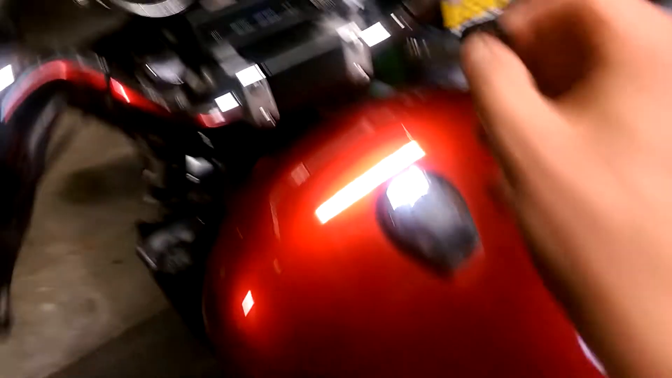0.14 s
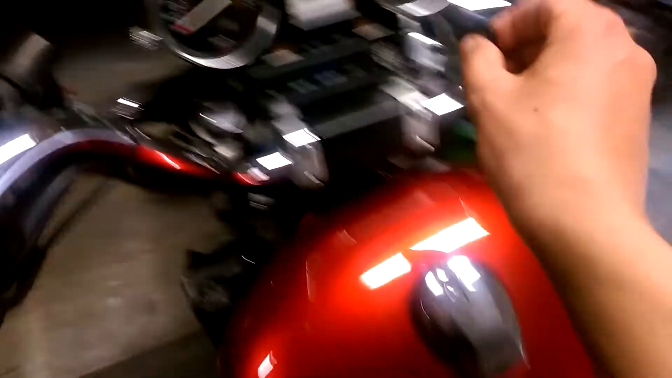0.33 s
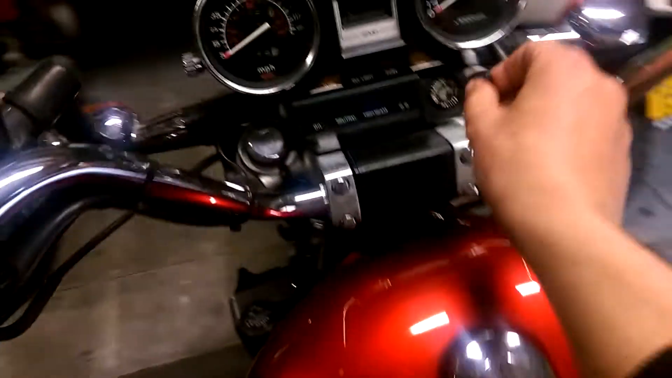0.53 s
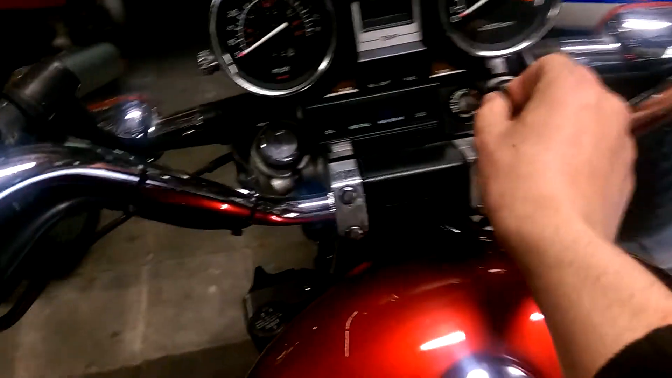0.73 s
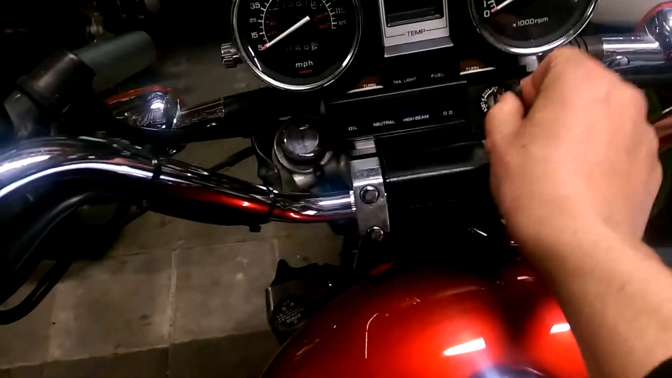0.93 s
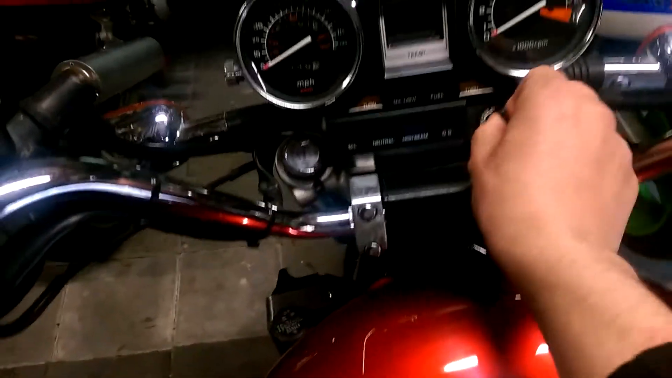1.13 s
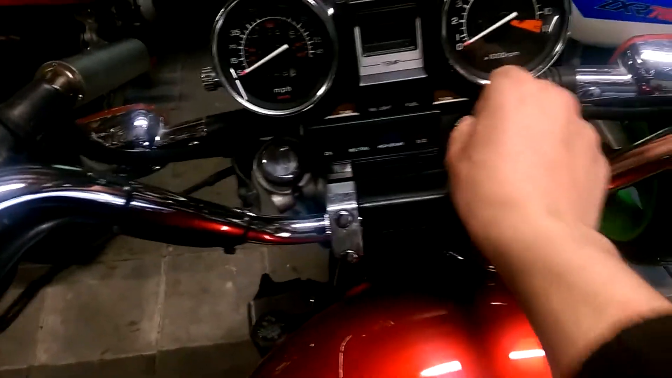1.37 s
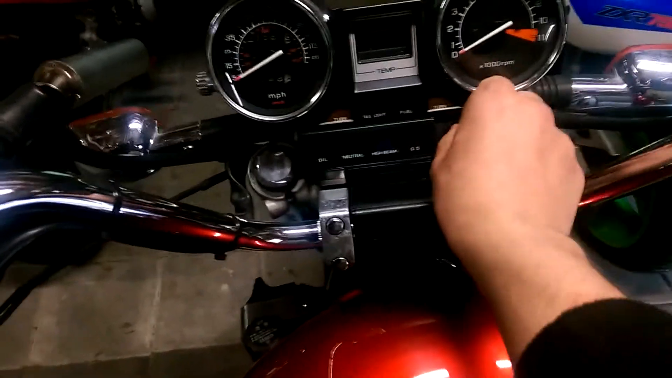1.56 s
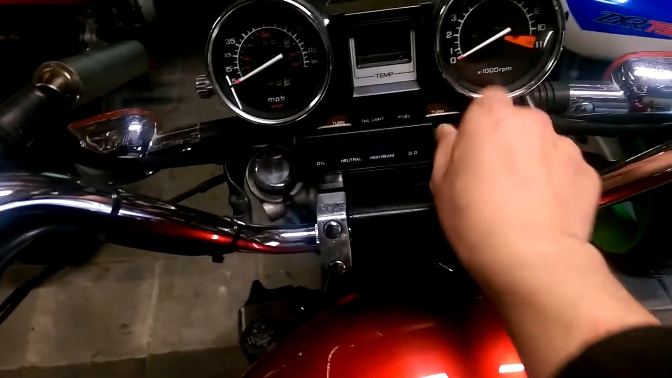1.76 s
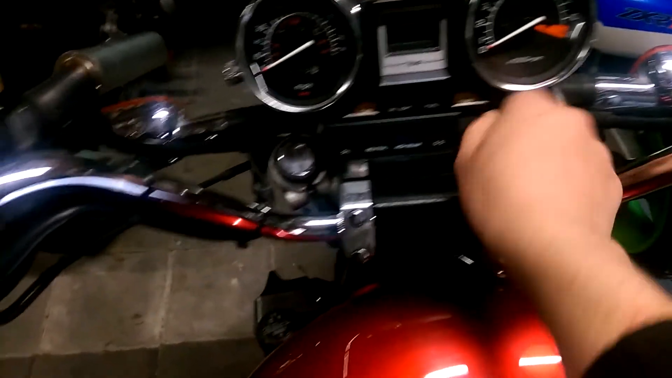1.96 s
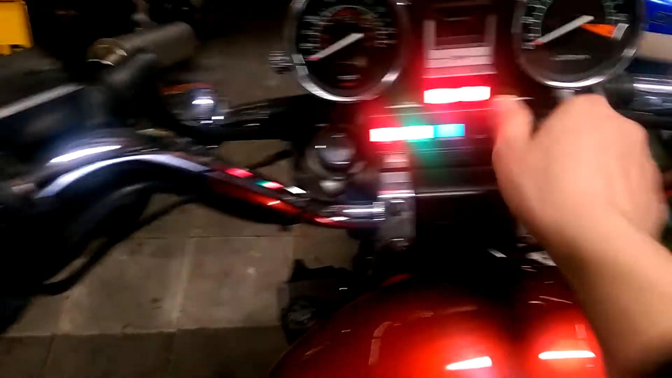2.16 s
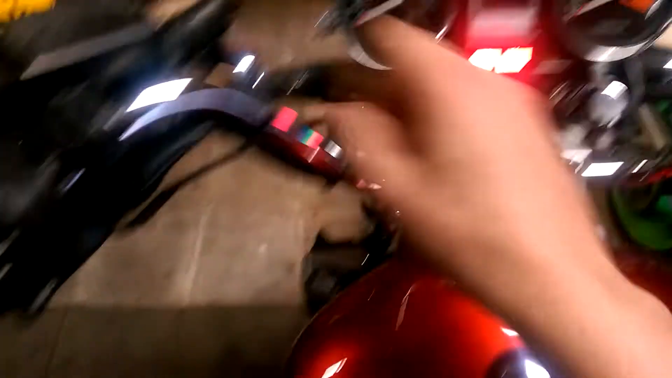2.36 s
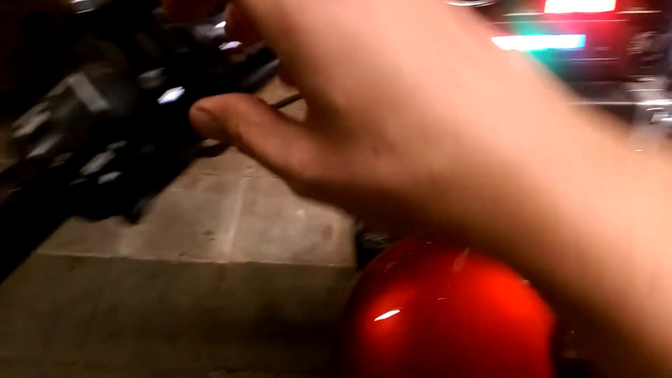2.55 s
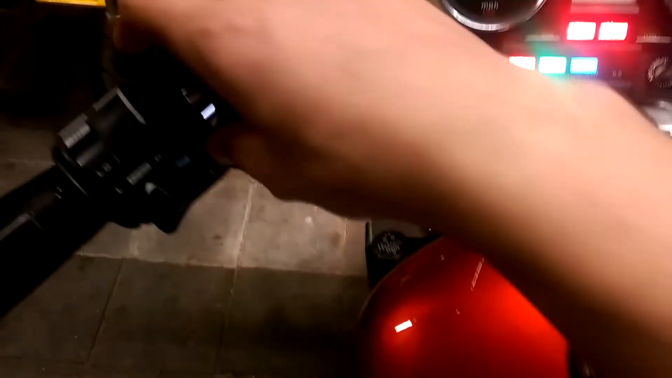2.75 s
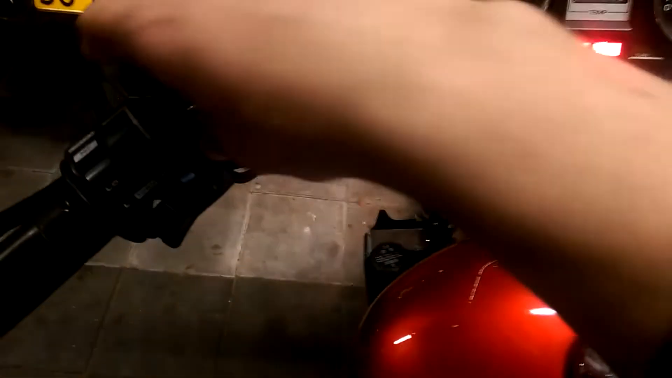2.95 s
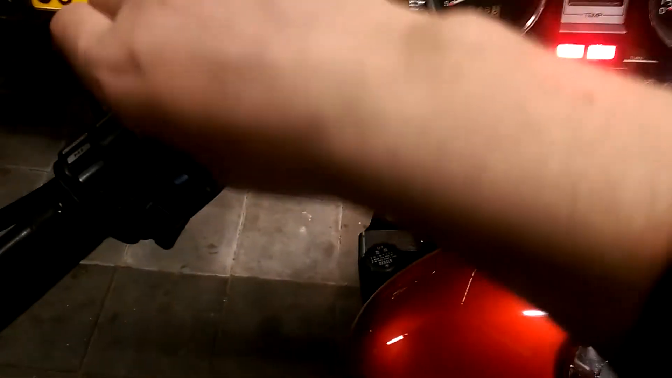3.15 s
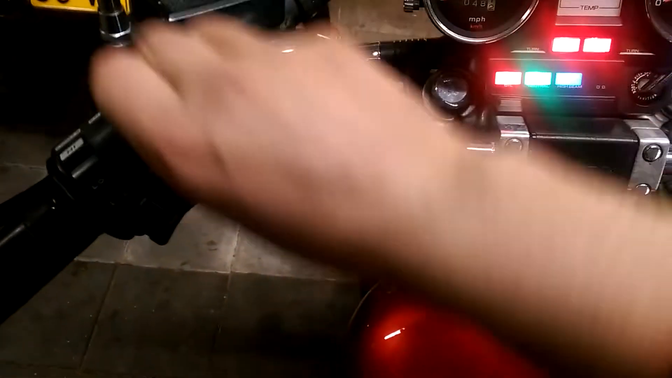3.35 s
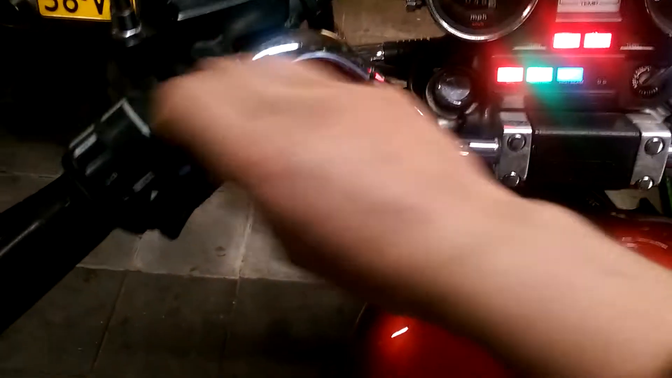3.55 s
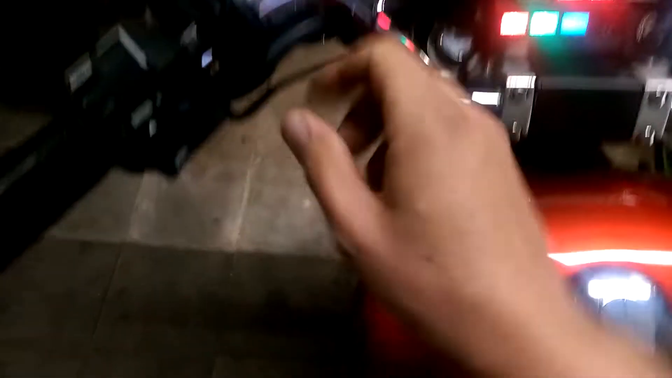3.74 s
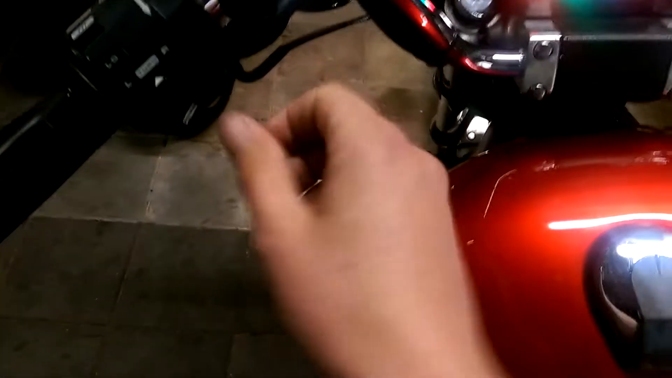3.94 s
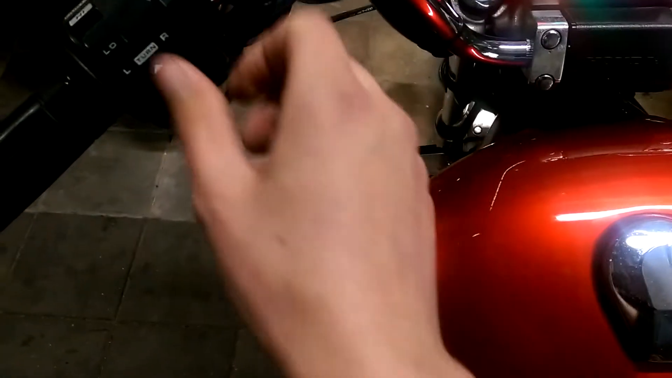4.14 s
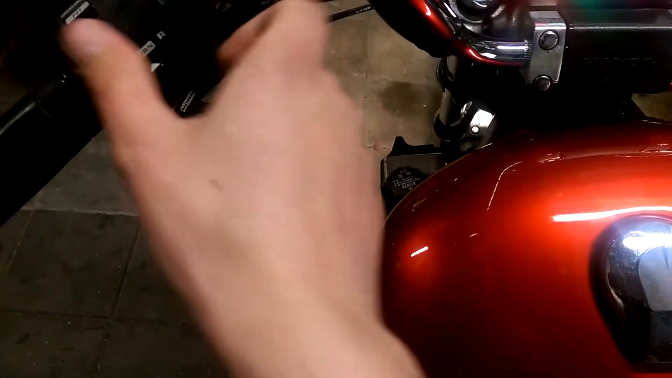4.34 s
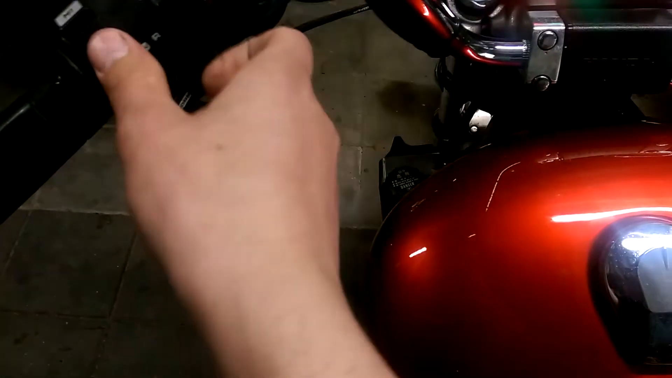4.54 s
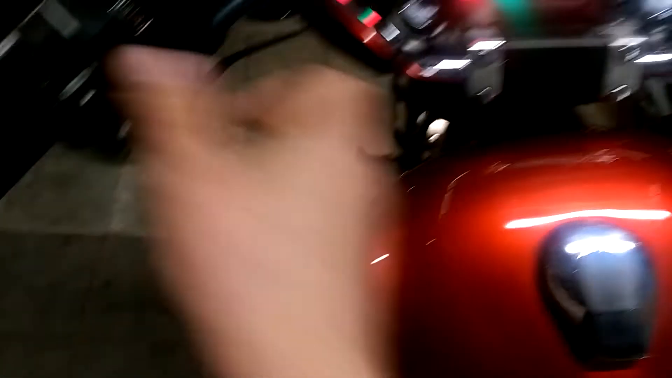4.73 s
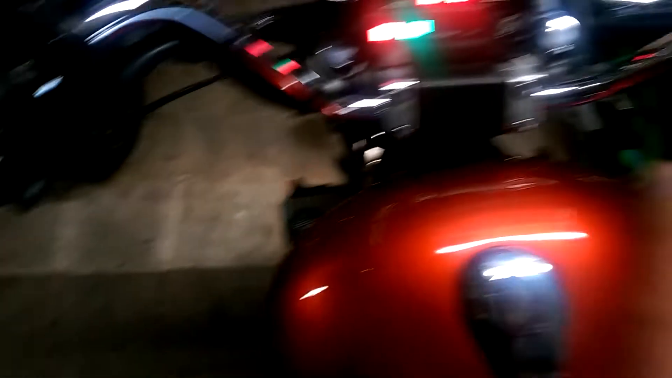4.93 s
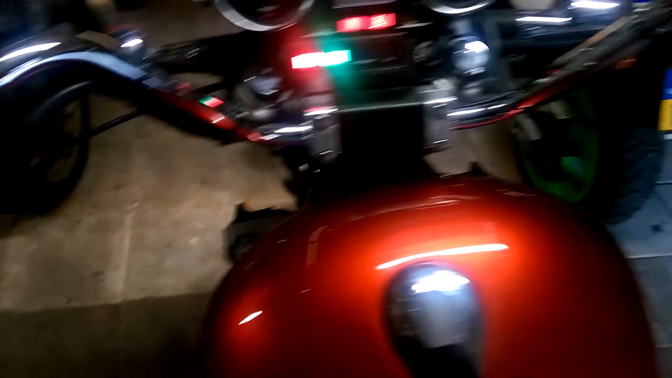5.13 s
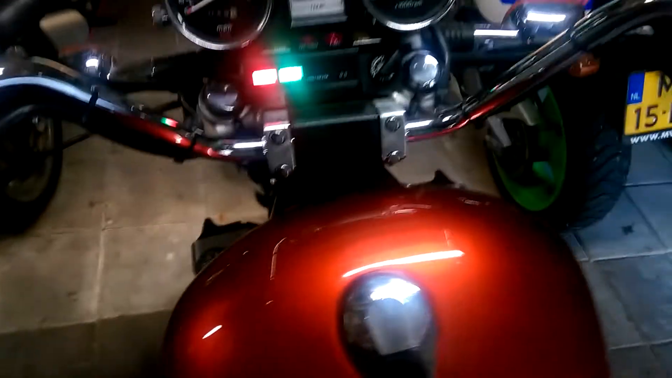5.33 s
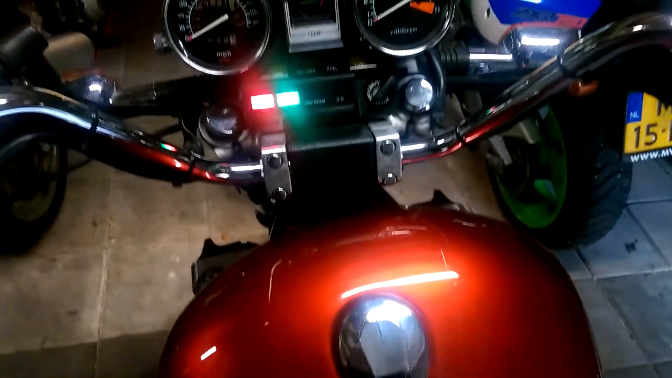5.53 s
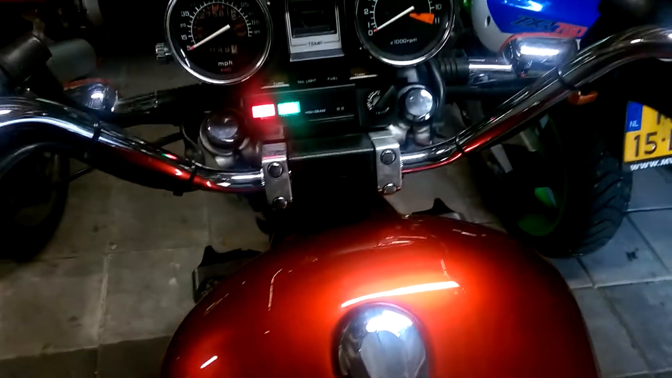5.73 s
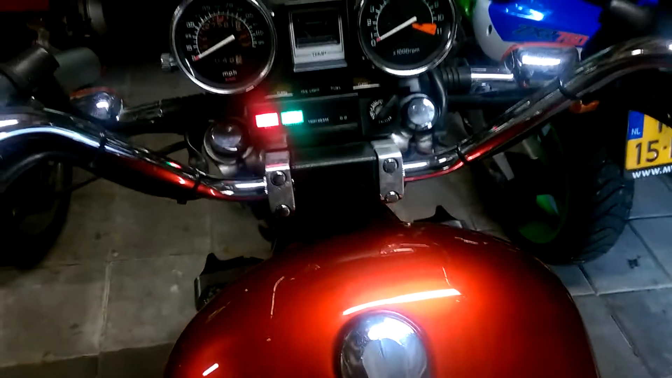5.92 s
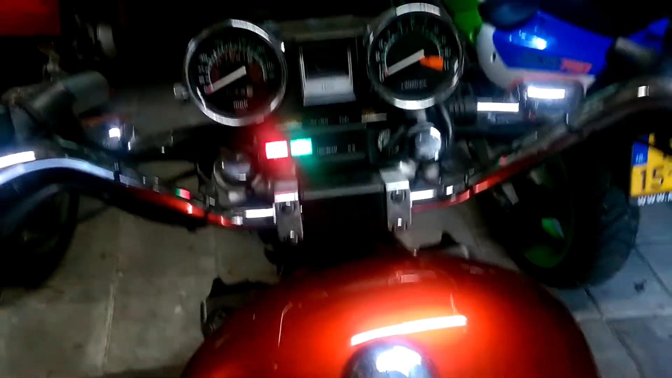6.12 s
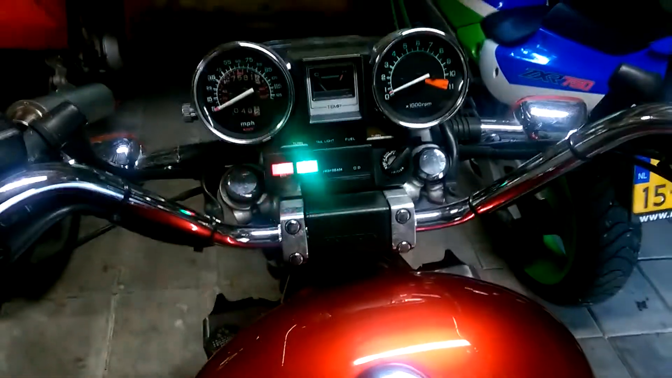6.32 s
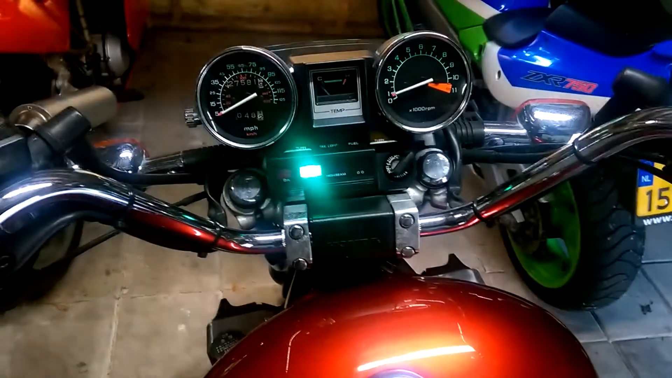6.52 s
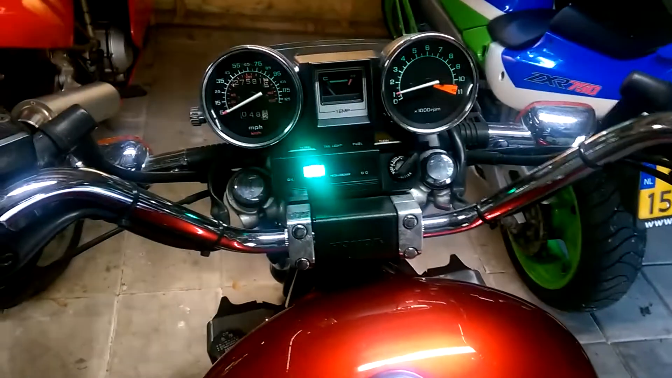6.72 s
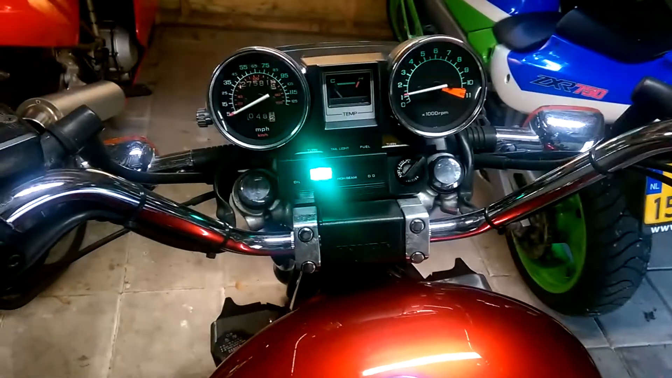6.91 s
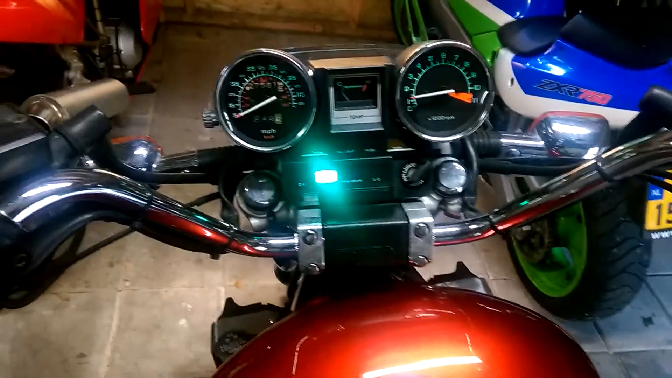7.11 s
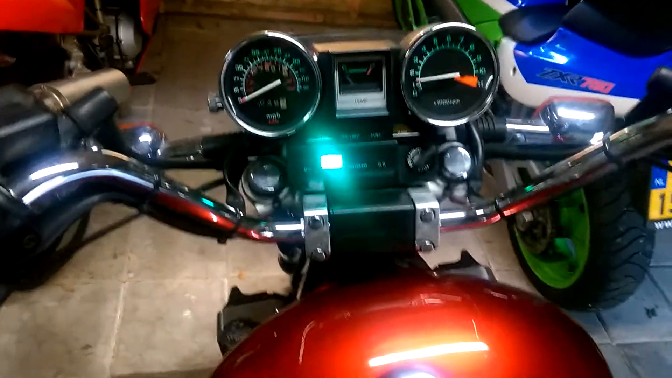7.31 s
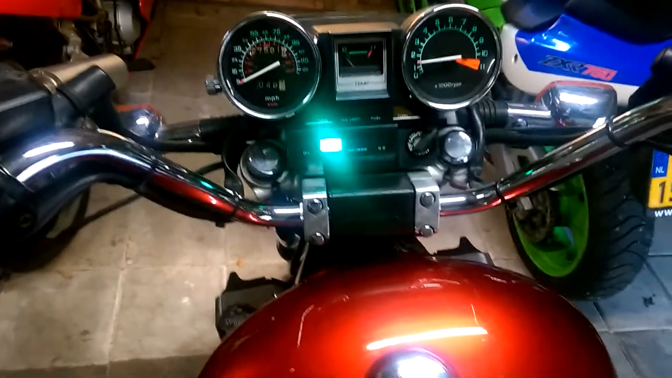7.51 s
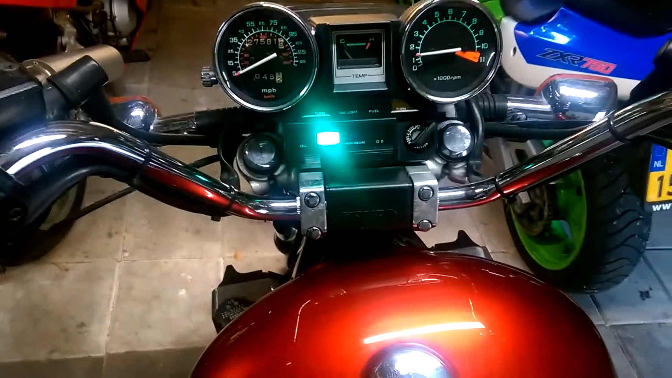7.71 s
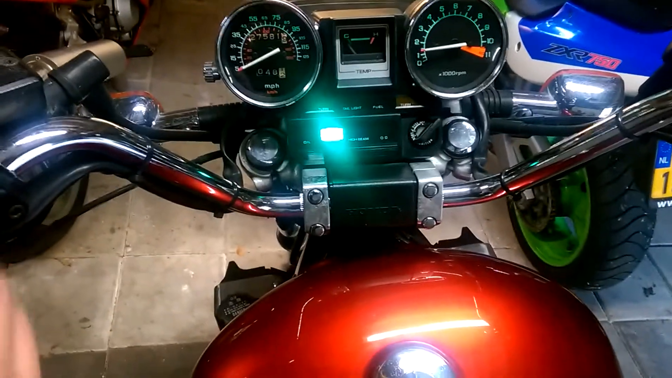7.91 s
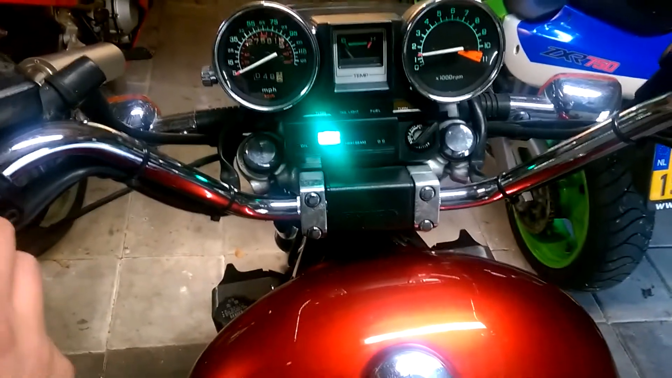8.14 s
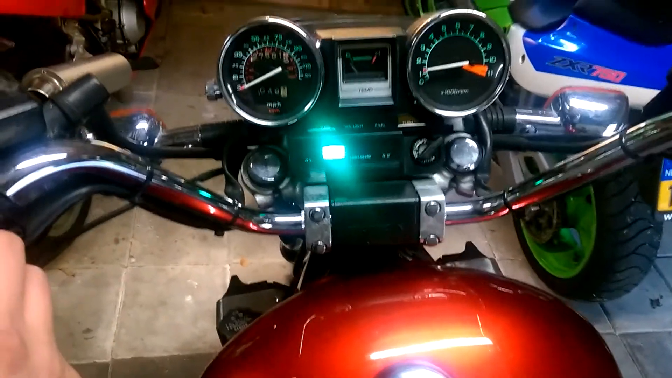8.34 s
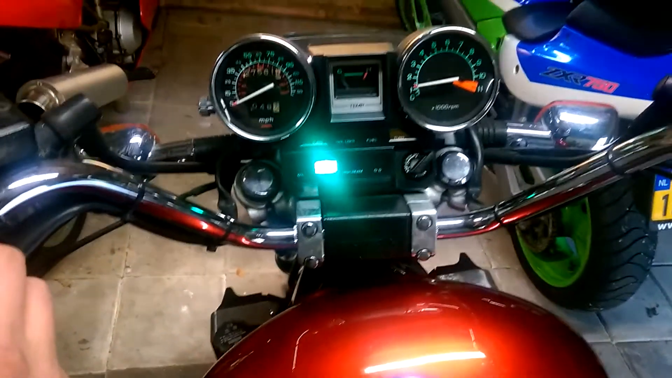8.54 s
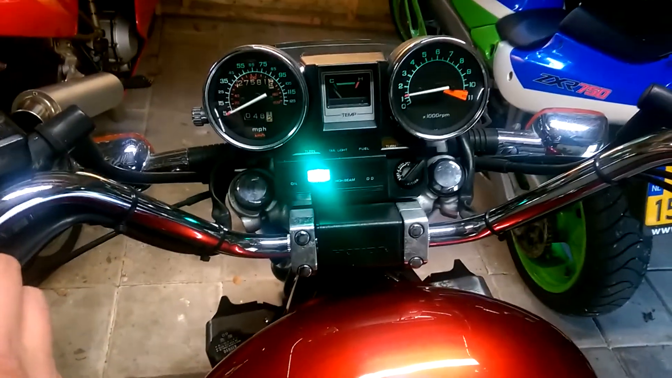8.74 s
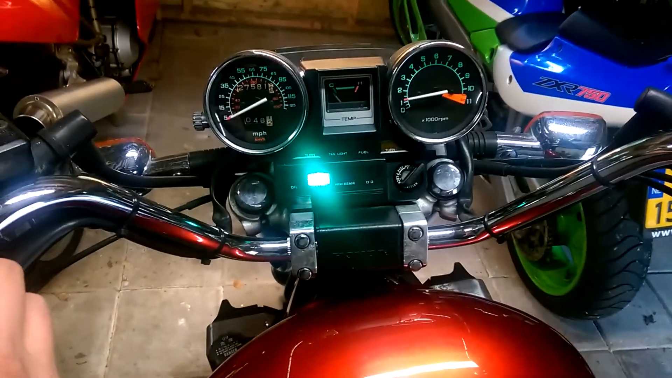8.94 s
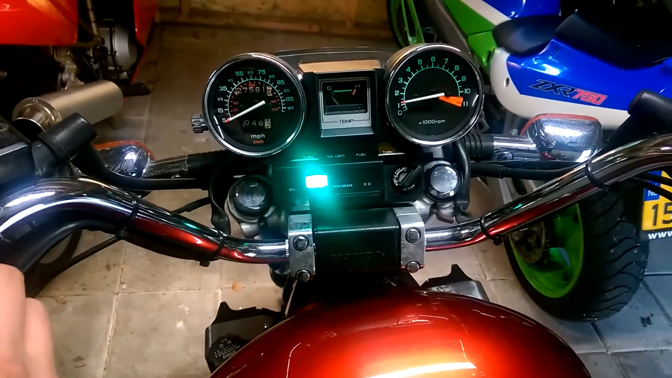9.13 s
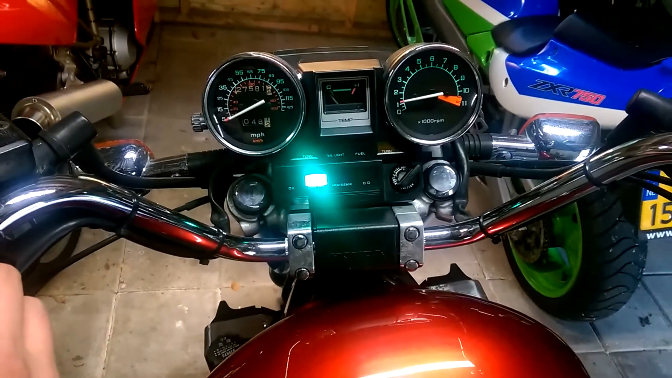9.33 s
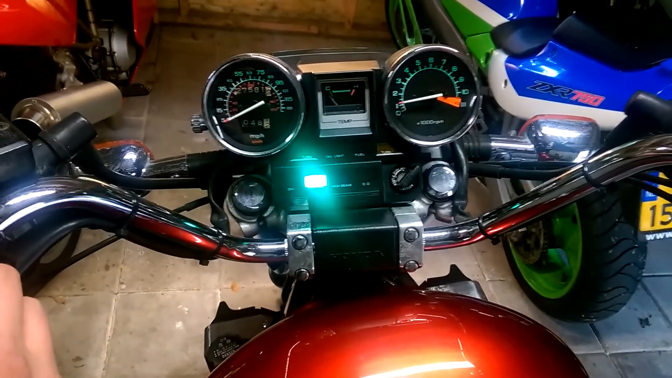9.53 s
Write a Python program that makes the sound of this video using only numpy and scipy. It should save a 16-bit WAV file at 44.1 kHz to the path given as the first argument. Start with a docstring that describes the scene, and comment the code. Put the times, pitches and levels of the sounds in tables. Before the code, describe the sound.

Key scrapes and clicks, a few sharp switch snaps, then a starter grinds and whines until a motorcycle engine catches and idles in a garage.

```python
"""A small garage, heard from above the tank, where a four-cylinder motorcycle is started cold.
The key scrapes, ticks and turns and switches click: short noise bursts excite damped resonances.
Starter gears grind and whine (tooth impacts, rough noise and gliding sines) until the engine catches.
Uneven firing impulses boom through exhaust and garage modes over noisy valve clatter and chain rush;
the fast idle then settles lower, with spells of a narrow-band rattle."""
import sys
import numpy as np
from scipy import signal
from scipy.fft import rfft, irfft, next_fast_len
from scipy.io import wavfile
from scipy.ndimage import uniform_filter1d

SR = 44100
rng = np.random.default_rng(int(sys.argv[2]) if len(sys.argv) > 2 else 0)


def waveform_to_disk(signal):
    """Save audio, clipped to [-1, 1], as 16-bit WAV at the path in sys.argv[1]."""
    frames = np.transpose(np.atleast_2d(signal))
    scaled = np.clip(frames, -1, 1) * 32767
    samples = np.round(scaled).astype(np.int16)
    wavfile.write(sys.argv[1], SR, samples)


N = 426447
T = np.arange(N) / SR
SIZE = next_fast_len(N + SR)
HZ = np.maximum(np.arange(SIZE // 2 + 1) * SR / SIZE, 1e-3)

# the starter engages, the engine catches, then fires evenly
STARTER_S, CATCH_S, EVEN_FROM_S = 5.626, 6.1, 6.485


def amp(db):
    """Level to amplitude: 20 dB is a factor of ten."""
    return 10 ** (np.asarray(db) / 20)


def curves(table):
    """Linear interpolation in time of each column of a table."""
    s, *columns = np.transpose(table)
    return [np.interp(T, s, c) for c in columns]


def unit(x):
    """Normalisation of the mean power: rms 1."""
    return x / np.sqrt(np.mean(x ** 2))


def through(x, response):
    """Linear filtering: the spectrum times a frequency response."""
    return irfft(rfft(x, SIZE) * response, SIZE)[..., :N]


def colour(points):
    """Minimum-phase response through (f/Hz, level/dB) points: a folded cepstrum makes it causal."""
    hz, db = np.transpose(points)
    level_db = np.interp(np.log(HZ), np.log(hz), db)
    cepstrum = irfft(np.log(amp(level_db)), SIZE)
    cepstrum[1:SIZE // 2] *= 2
    return np.exp(rfft(cepstrum[:SIZE // 2], SIZE))


def resonances(modes):
    """Modal superposition: summed damped oscillators (f/Hz, width/Hz, level/dB)."""
    return sum(amp(db) / (1 + 1j * (HZ / hz - hz / HZ) * hz / width) for hz, width, db in modes)


def noise():
    """White noise: equal power at every frequency."""
    return rng.standard_normal(N)


def ears(apart_hz):
    """Diffuse-field coherence: noise alike at both ears in the bass, unrelated well above apart_hz."""
    difference = through(noise(), 1j * HZ / (apart_hz + 1j * HZ))
    return noise() + np.array([[1], [-1]]) * difference


def walk(rate):
    """Low-pass random modulation: smoothed steps, rate per second, with rms 1."""
    k = max(int(SR / rate), 1)
    steps = np.repeat(rng.standard_normal(N // k + 1), k)[:N]
    return unit(uniform_filter1d(steps, k))


def since(start_s):
    """Elapsed time in seconds, 0 before the start."""
    return np.maximum(T - start_s, 0)


def ramp(start_s, length_s):
    """Linear onset from 0 to 1."""
    return np.clip((T - start_s) / length_s, 0, 1)


def swell(middle_s, length_s):
    """Raised-cosine envelope: a smooth rise and fall."""
    return np.cos(np.pi * np.clip((T - middle_s) / length_s, -.5, .5)) ** 2


def garage(x, wet_db, t60_low=1.0, t60_high=0.21):
    """Reverberation: dense reflections, different at each ear, decay exponentially by band."""
    t = T[:SR * 2 // 3]
    echoes = rng.standard_normal((2, len(t))) * np.clip((t - .003) / 0.0044, 0, 1)
    low = signal.sosfilt(signal.butter(1, 3000, fs=SR, output="sos"), echoes)
    high = echoes - low
    tail = low * amp(-60 * t / t60_low) + high * amp(-60 * t / t60_high)
    tail /= np.sqrt(np.sum(tail ** 2) / 2)
    reflected = through(x, rfft(tail, SIZE))
    return (x + amp(wet_db) * reflected) / np.sqrt(1 + amp(2 * wet_db))


def background(hum_hz=64, hum_width=11, hum_db=-54, air_db=-55):
    """Ambient noise: a frequency-modulated hum in resonant noise, under partly coherent broadband air."""
    # air spectrum: f/Hz, relative level/dB
    air_colour = [(60, -4.5), (120, -4), (250, -12.5), (500, -14.5), (1100, -14), (2200, -16),
                  (4000, -21.5), (7000, -28), (16000, -28.5)]
    # squaring the resonance narrows it
    hum = unit(through(noise(), resonances([(hum_hz, hum_width, 0)]) ** 2))
    steady = np.sin(2 * np.pi * np.cumsum(hum_hz + 2.0 * walk(5.8)) / SR)
    two_sides = np.array([noise(), noise()])
    air = unit(through(two_sides + noise(), colour(air_colour)))
    return amp(hum_db) * unit(hum + 0.55 * steady) + amp(air_db) * air


def key_scrapes():
    """Sliding friction: randomly modulated noise as the key blade scrapes over the lock and into it."""
    # scraping strokes: middle t/s, level/dB, length/s
    scrapes = [(0.298, -38, 0.12), (0.575, -46, 0.22), (0.856, -42, 0.092)]
    # friction spectrum: f/Hz, relative level/dB
    scrape_colour = [(410, -37), (700, -30), (922, -36), (1020, -21), (2330, -5), (7790, -12.5),
                     (12600, -8), (16000, -24)]
    push = sum(amp(db) * swell(s, length) for s, db, length in scrapes)
    friction = unit(through(noise() * amp(2 * walk(440)), colour(scrape_colour)))
    return garage(push * friction, wet_db=5.5)


def clicks(table, body, pan_db, tail_s):
    """Impact excitation: a short noise crack rings the body, with a low thud and a diffuse wash."""
    thud_hz, thud_width, bright_hz = 380, 330, 4500
    attack_share, treble_s = 0.18, 0.26  # attack time re ring time; extra treble decay time
    crack, thud = np.zeros((2, 2, N))
    t = T[:SR // 2]
    for s, db, ring_ms, thud_db, bright_db, wet_db in table:
        ring_s = ring_ms / 1000
        attack = 1 - np.exp(-t / (attack_share * ring_s))
        direct = rng.standard_normal(len(t)) * np.exp(-t / ring_s) * attack
        wash = rng.standard_normal((2, len(t))) * np.exp(-t / tail_s) * (1 - np.exp(-t / ring_s))
        burst = amp(db) * (direct + amp(wet_db) * np.sqrt(ring_s / tail_s) * wash)
        dull = signal.sosfilt(signal.butter(1, bright_hz, fs=SR, output="sos"), burst)
        i = int(s * SR)
        crack[:, i:i + len(t)] += dull + amp(bright_db) * (burst - dull) * np.exp(-t / treble_s)
        thud[:, i:i + len(t)] += burst * amp(thud_db)
    pan = amp(np.array([[pan_db], [-pan_db]]) / 2)  # left minus right
    ringing = through(crack, body)
    # squared, the resonance peaks at +8 dB
    knock = through(thud, resonances([(thud_hz, thud_width, 4)]) ** 2)
    return pan * (ringing + garage(knock, wet_db=3.5, t60_low=0.41, t60_high=0.35))


def pin_ticks():
    """Impact excitation of plate modes: lock pins ride over the key's teeth and set it ringing."""
    # ticks: t/s, level/dB before filtering, ring time/ms, thud/dB, brightness/dB, wash/dB
    ticks = [(.786, -31.5, 9.8, -14, -5, 0), (.974, -23, 2.2, -24, -15, -6), (1.04, -32, 6.8, -24, -12, -3),
             (1.108, -23, 3.1, -32, -1, -6), (1.239, -24.5, 5.7, -20, -20, -3.5)]
    # modes of the key: f/Hz, width/Hz, level/dB
    key_ring = [(700, 30, 2), (1384, 25, 8), (1940, 200, 9.5), (2095, 34, 14), (2640, 700, -6)]
    return clicks(ticks, resonances(key_ring), pan_db=-2.5, tail_s=0.052)


def lock_clicks():
    """Impact and modal response: the key knocks into the lock and turns, ringing barrel and housing."""
    # knocks: t/s, level/dB before filtering, ring time/ms, thud/dB, brightness/dB, wash/dB
    lock_knocks = [(.331, -24.5, 1.1, -8, -11, -9), (1.302, -8, 1.4, -3, -21, -7),
                   (1.411, -34, 1.5, -23, 3, 0), (1.456, -36, 9.7, -18, -5, 0),
                   (1.543, -28, 17, -2.5, -4, -3.5), (1.752, -29, 7.9, -14, -20, -5),
                   (1.774, -25.5, 4.2, 6, -20, -7), (2.083, -37, 5, -16, -14, -4),
                   (2.093, -15, 4.8, -18, 2, -2.5), (2.264, -28, 1.05, -12, 3, -1.5),
                   (2.276, -39, 1.3, -12, 0, -1)]
    # click spectrum: f/Hz, level/dB
    click_colour = [(200, -32.5), (550, -0.5), (950, -3), (2300, 8.5), (3600, 4), (5000, -3), (10000, -5.5),
                    (16000, 0.5)]
    # modes of lock barrel and housing: f/Hz, width/Hz, level/dB
    housing = [(1030, 290, 0.5), (1430, 26, 3), (1980, 100, -4), (2090, 20, 6), (2710, 140, 2),
               (4430, 240, -6)]
    body = colour(click_colour) + resonances(housing)
    return clicks(lock_knocks, body, pan_db=-0.5, tail_s=0.068)


def switch_clicks():
    """Snap impacts coloured by a resonant housing: left grip controls, then starter relay and clutch."""
    # snaps: t/s, level/dB before filtering, ring time/ms, thud/dB, brightness/dB, wash/dB
    snaps = [(3.165, -17, 1.46, -22, 1, -6.5), (3.19, -36, 1.8, -20, 1, -9),
             (3.327, -28.5, 8.6, -9, -21, -4), (4.542, -3, 1.53, -37, 9.5, -10.5),
             (5.626, -21.5, 17, -12, 8.5, -5), (5.659, -7, 2.8, -13, -18, -11)]
    # snap spectrum: f/Hz, level/dB
    switch_colour = [(260, -63), (450, -35), (1010, 2.5), (1340, -4.5), (1440, -5.5), (2360, 1),
                     (3590, -2.5), (6430, -8), (13600, -12), (16000, -14)]
    # modes of the switch housing: f/Hz, width/Hz, level/dB
    switch_housing = [(1020, 450, -7), (1590, 400, -8)]
    body = colour(switch_colour) * (1 + resonances(switch_housing))
    return clicks(snaps, body, pan_db=-6.0, tail_s=0.068)


def rattle(ring_hz=3197, width_hz=140):
    """Noise-driven resonance: a loose metal part is shaken into a narrow, fluttering ring, in spells."""
    # spells: middle t/s, length/s, level/dB
    spells = [(7.925, 0.49, -36), (8.53, 0.28, -37), (9.127, 0.35, -34.5)]
    shaken = noise() * amp(2.5 * walk(36))
    ring = unit(through(shaken, resonances([(ring_hz, width_hz, 0)]) ** 2))  # squaring narrows it
    loudness = sum(amp(db) * swell(s, length) for s, length, db in spells)
    return garage(ring * loudness, wet_db=6.0, t60_low=0.33, t60_high=0.095)


def surges(spin_up_db=-29.5, attack_s=0.019, release_db_per_s=79):
    """Load modulation: starter gain leaps up, holds and decays as compressions come and go."""
    # surges, with a last kick at the misfire: start t/s, level/dB, hold/s
    kicks = [(5.651, -12.5, 0.058), (5.76, -13, 0.029), (5.827, -12, 0.1), (5.991, -13, 0.099),
             (6.269, -11.5, 0.012)]
    gain = amp(spin_up_db) * ((T > STARTER_S) & (T < CATCH_S))
    for s, db, hold_s in kicks:
        decay = amp(db - release_db_per_s * since(s + hold_s))
        gain = np.maximum(gain, ramp(s, attack_s) * decay)
    return gain


def starter(rough=0.0301, third_db=-14, tooth_scatter_db=5, flutter_db=4.5):
    """Gear meshing: impacts and harmonics at the tooth rate sag at compressions; a second mesh whines higher."""
    # gears, dragged down at each compression: t/s, tooth rate f/Hz, whine level/dB, octave/dB re whine
    tooth_curve = [(5.63, 1270, -3, -6), (5.675, 1315, 0.5, -6), (5.725, 1235, -7.5, 2.5),
                   (5.79, 990, -3.5, 0.5), (5.83, 1120, -8, -1), (5.85, 1225, -0.5, -4),
                   (5.895, 1165, -4.5, -1.5), (5.96, 1080, 0, -13), (6.0, 1150, -8, -1),
                   (6.028, 1250, 0.5, 0), (6.07, 1175, 3, -7), (6.13, 1170, 4, -10), (6.25, 1190, -10, -8),
                   (6.3, 1405, -2.5, 2.5), (6.34, 1290, -1, -10), (6.43, 1250, -0.5, -9)]
    # a second, shriller whine from another gear mesh: t/s, tooth rate f/Hz, level/dB
    pinion_curve = [(5.67, 1626, -11), (5.7, 1693, -2), (5.722, 1813, -4), (5.745, 1650, -2),
                    (5.79, 1774, -3.5), (5.85, 1913, -9), (5.93, 1880, -2), (6.02, 1900, -6),
                    (6.2, 1912, -2), (6.3, 1960, -23)]
    # grinding spectrum: f/Hz, relative level/dB
    grind_colour = [(300, -35), (680, -22), (900, -3), (1120, 0), (1280, -2.5), (1480, -10.5), (1750, -5),
                    (1920, 1.5), (2200, -4), (2500, -1.5), (3000, -5), (3600, -7), (5500, -20.5),
                    (11000, -21), (16000, -34)]
    tooth_hz, whine_db, octave_db = curves(tooth_curve)
    pinion_hz, pinion_db = curves(pinion_curve)
    # phases in turns, with rough pitch
    teeth, pinion_turns = (np.cumsum(hz * (1 + rough * walk(300))) / SR for hz in (tooth_hz, pinion_hz))
    impacts = np.diff(np.floor(teeth), prepend=0) * amp(tooth_scatter_db * walk(1500))
    grit = ears(apart_hz=700) * amp(2.0 * walk(400) + 2.2 * walk(90))
    grind = unit(through(0.28 * unit(impacts) + unit(grit), colour(grind_colour)))
    lines = [(teeth, whine_db), (2 * teeth, whine_db + octave_db),
             (3 * teeth, whine_db + third_db), (pinion_turns, pinion_db)]
    whine = sum(amp(db) * unit(amp(flutter_db * walk(200)) * np.sin(2 * np.pi * turns))
                for turns, db in lines)
    # the sum keeps an even power, so a weak whine leaves bare grinding
    gears = (grind + whine) / np.sqrt(1 + sum(amp(2 * db) for _, db in lines))
    return garage(gears * surges(), wet_db=-1, t60_low=0.2, t60_high=0.12)


def speed(cranking=4):
    """Rotational kinematics: engine cycles per second, turned by the starter, then running."""
    # running speed: t/s, four-stroke cycle rate f/Hz
    running_speed = [(6.1, 9.3), (6.55, 9.6), (6.75, 10.3), (6.95, 11.4), (7.25, 11.65), (7.45, 11.3),
                     (7.58, 10.7), (7.78, 10.6), (7.97, 9.9), (8.15, 9.4), (8.55, 9.45), (8.8, 9.23),
                     (9.4, 9.23), (9.67, 9.7)]
    return np.where(T < CATCH_S, cranking, curves(running_speed)[0])


def crank(zero_s=7.127):
    """Phase as the integral of rate: engine cycles turned, counted from zero_s."""
    cycles = np.cumsum(speed()) / SR
    return cycles - np.interp(zero_s, T, cycles)


def strokes(cycles, place, jitter_s, scatter_db):
    """Quasi-periodic impulse train: one uneven impulse per engine cycle, at a given place in it."""
    turns = np.arange(np.ceil(cycles[0]) + 1, cycles[-1]) + place
    chance = rng.standard_normal((100, 2))[:len(turns)]
    moments = np.interp(turns, cycles, T, right=2 * T[-1]) + jitter_s * chance[:, 0]
    at = (moments * SR).astype(int)
    return np.bincount(np.maximum(at, 0), amp(scatter_db * chance[:, 1]), N)[:N]


def shaking(level_db=-27.5, start_db=-10, build_s=0.17, db_per_cycle_rate=0.68):
    """Speed-dependent excitation: mechanical noise grows after the catch and follows engine speed."""
    rate = speed()
    speed_db = db_per_cycle_rate * (rate - rate[T > CATCH_S].mean())
    shortfall_db = start_db * np.exp(-since(CATCH_S) / build_s)
    return (T > STARTER_S) * amp(level_db + shortfall_db + speed_db)


def clatter(cycles, chain_db=-4, case_db=-4, valve_db=-9, fade_s=0.008, lash=0.091, tap_db=-1,
            apart_hz=900):
    """Structure-borne sound: valve impacts and chain noise excite the modes of the engine cases."""
    # valves and tappets snap shut: place in cycle (0-1), level/dB
    valve_places = [(.05, 4), (.165, 1), (.43, 2), (.58, 1)]
    # spectra of chain rush and valve noise: f/Hz, relative level/dB
    chain_colour = [(150, -16.5), (280, -4), (400, -7), (560, -7), (750, -4.5), (1150, -10.5), (1500, -13),
                    (2000, -9), (3000, -17), (4800, -17.5), (7500, -25), (16000, -32.5)]
    valve_colour = [(1000, 0.5), (2500, 10.5), (4500, 2), (7000, -5.5), (13000, -2.5), (16000, -23)]
    # crankcase and cylinder head modes: f/Hz, width/Hz, fast idle level/dB, slow idle level/dB
    case_modes = [(470, 42, -2, -5), (546.4, 12.6, 5, 5), (856.6, 22, 5.5, 0), (975, 7.7, 4, 1.5),
                  (1018.5, 10, 5.5, 2.5), (1920, 33, 0, 2.5), (2610, 63, -1.5, 2.5), (3170, 44, 1.5, 1.5),
                  (4200, 69, -18, -9), (5380, 170, -17.5, -19.5)]
    fast_idle, idle_drop = 11.13, 1.5  # cycles per s
    hits = sum(strokes(cycles, place, jitter_s=.001, scatter_db=1.0) * amp(db)
               for place, db in valve_places)
    beat = unit(through(hits, 1 / (1 + 2j * np.pi * HZ * fade_s)))  # each hit decays exponentially
    chains = unit(through(ears(apart_hz) * (1 + 0.029 * beat), colour(chain_colour)))
    rush = unit(ears(apart_hz) * (1 + lash * beat) * amp(3.3 * walk(300)))
    knocks = rush + amp(tap_db) * unit(hits)
    # each panel rings more or less as the shaking drifts across its resonance
    slow = np.clip((fast_idle - speed()) / idle_drop, 0, 1)
    cases = unit(sum(through(knocks, resonances([(hz, width, 0)]))
                     * amp(2.4 * walk(7) + fast_db + slow * (slow_db - fast_db))
                     for hz, width, fast_db, slow_db in case_modes))
    valves = unit(through(noise() * beat, colour(valve_colour)))
    valve_field = garage(valves, wet_db=7.5, t60_low=0.38, t60_high=0.11)
    body = amp(chain_db) * chains + amp(case_db) * cases
    return (body + amp(valve_db) * valve_field) * shaking()


def exhaust(cycles, level_db=-13, silencer_hz=280, cut_hz=36):
    """Pulsed volume source: firing puffs excite modes of silencers and garage; cranking only pumps air."""
    # cylinders: place in cycle (0-1), fast idle level/dB, slow idle level/dB
    cylinders = [(-.043, 2.5, 1.5), (0.327, -1, -2), (.434, -2, 1.5), (.838, -3, -5)]
    # single coughs, with a gap where it misfires: t/s, level/dB
    first_firings = [(6.132, -7.5), (6.2, -5.5), (6.243, -12), (6.326, -8.5), (6.368, -2), (6.412, -8),
                     (6.46, -1.5)]
    # exhaust and garage modes: f/Hz, width/Hz, level/dB
    boom_modes = [(43.4, 8.6, -4.5), (71.3, 29, -12.5), (102.5, 4.1, -1), (119.5, 12.5, 1.5),
                  (136.9, 5.97, 6.5), (161.4, 6.7, -3.5), (205.9, 6, -7.5), (224.1, 18.4, -13)]
    # puff levels re fast idle: unfired pumping, first even running, slow idle; time to gather strength
    pump_db, cold_db, slow_idle_db, build_s = -35.5, -2.5, -1, 0.28
    settled = ramp(7.83, 0.25)  # 0 at fast idle, 1 at slow idle
    puffs = sum(strokes(cycles, place, jitter_s=0.00045, scatter_db=1.04)
                * amp(fast_db + settled * (slow_db - fast_db))
                for place, fast_db, slow_db in cylinders)
    running = T > STARTER_S
    burn_db = cold_db * (1 - ramp(EVEN_FROM_S, build_s)) + slow_idle_db * settled
    pumping = amp(pump_db) * (running & (T < CATCH_S))
    firings = puffs * (pumping + amp(burn_db) * (T > EVEN_FROM_S))
    for s, db in first_firings:
        firings[int(s * SR)] += amp(db)
    # far from the pipe ends neighbouring modes swing in opposite senses, so each puff swells and lingers
    modes = sum((-1) ** k * resonances([mode]) for k, mode in enumerate(boom_modes))
    silencer = signal.freqs(*signal.butter(4, silencer_hz, analog=True), HZ)[1]
    # an open pipe radiates no deep bass
    outlet = (HZ / cut_hz) ** 2 / (1 + 1j * HZ / cut_hz - (HZ / cut_hz) ** 2)
    boom = through(firings, modes * silencer * outlet)
    return garage(boom / np.std(boom[running]) * amp(level_db), wet_db=-25.5)


def scene():
    """Superposition: the pressures of all sources add."""
    cycles = crank()
    controls = pin_ticks() + lock_clicks() + switch_clicks() + key_scrapes()
    engine = rattle() + starter() + clatter(cycles) + exhaust(cycles)
    return background() + controls + engine


def record(dry, lag_s=.00012, top_hz=16000):
    """Two-microphone reception: unequal colour, the left later; saturation rounds peaks, a low-pass ends it."""
    # microphone imbalance: f/Hz, left minus right level/dB
    imbalance = [(60, 0.5), (110, 0), (200, 1), (380, -0.5), (700, 1), (1290, 3), (2380, 6.5), (4400, -0.5),
                 (8120, 3.5), (15000, 18.5)]
    hz, tilt_db = np.transpose(imbalance)
    lean_db = np.interp(np.log(HZ), np.log(hz), tilt_db)
    gains = amp(np.array([lean_db, -lean_db]) / 2)
    delays = np.exp(-2j * np.pi * HZ * np.array([[lag_s], [0]]))
    heard = through(dry, delays * gains / gains.mean(axis=0))
    rounded = heard / (1 + (heard / .9) ** 6) ** (1 / 6)
    return signal.sosfilt(signal.ellip(8, .2, 70, top_hz, fs=SR, output="sos"), rounded)


dry = scene()
out = record(dry)
waveform_to_disk(out)
```